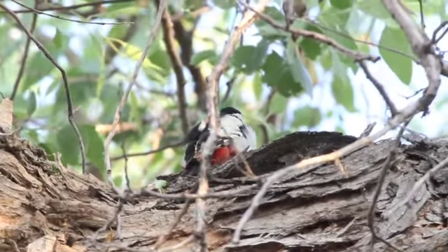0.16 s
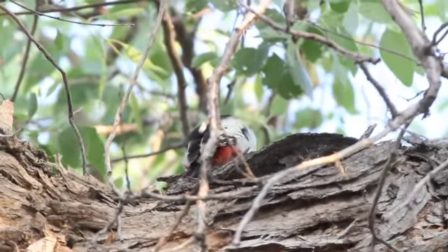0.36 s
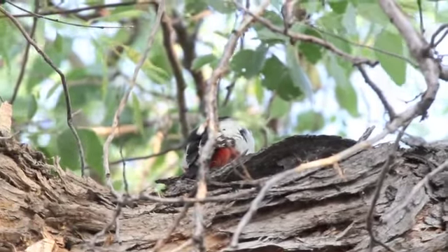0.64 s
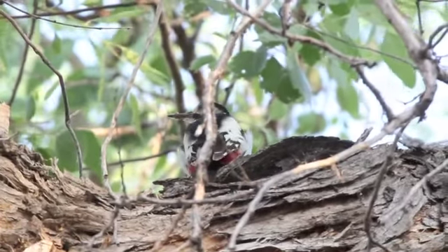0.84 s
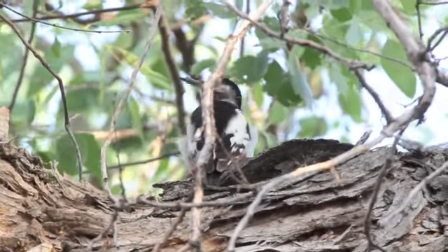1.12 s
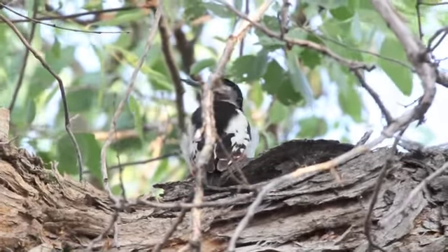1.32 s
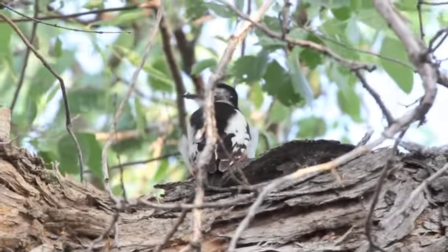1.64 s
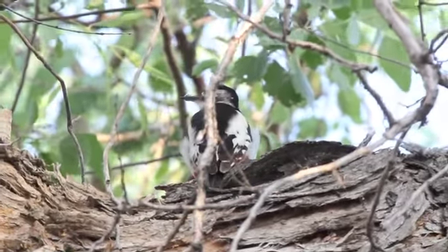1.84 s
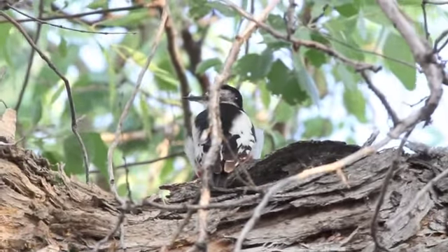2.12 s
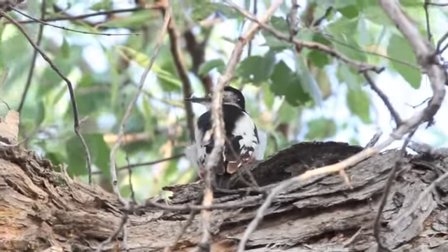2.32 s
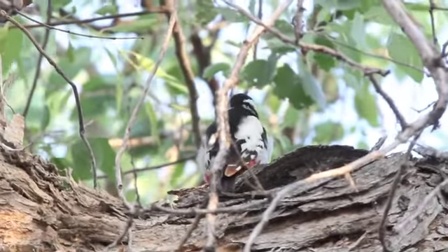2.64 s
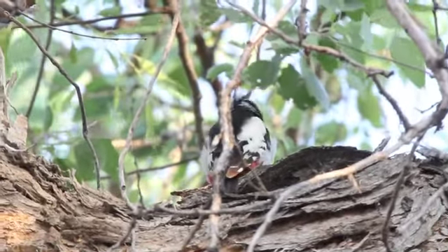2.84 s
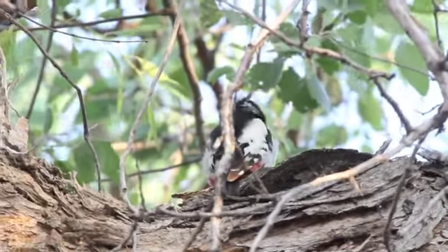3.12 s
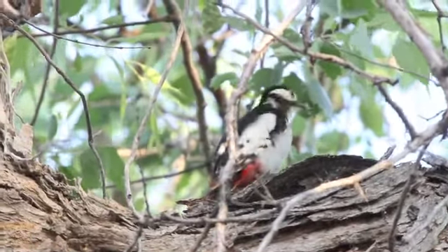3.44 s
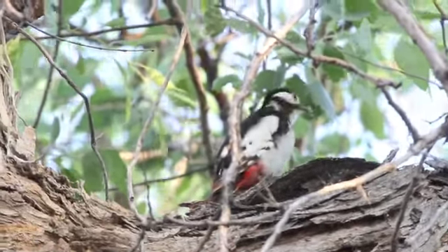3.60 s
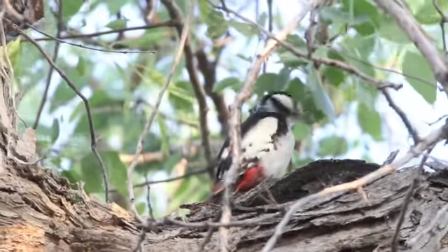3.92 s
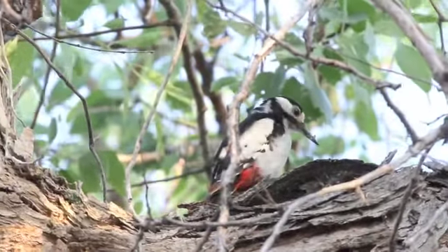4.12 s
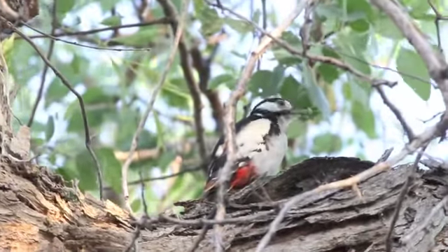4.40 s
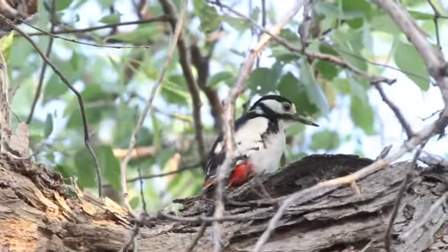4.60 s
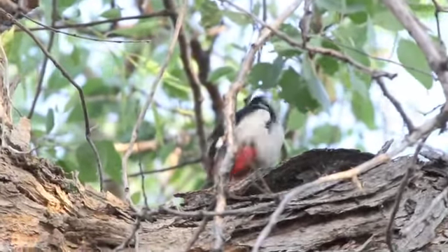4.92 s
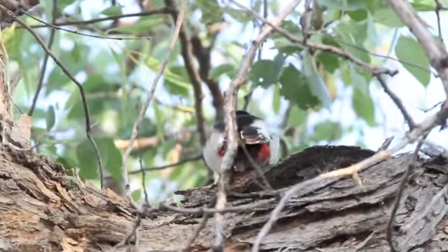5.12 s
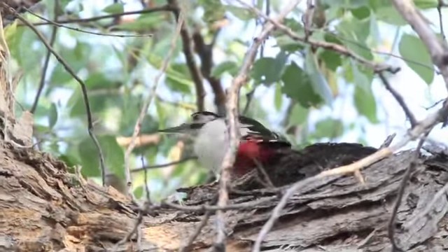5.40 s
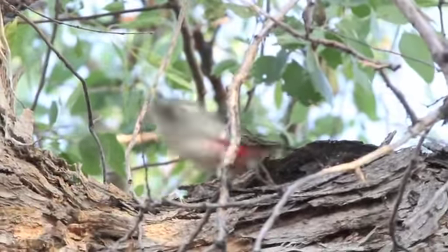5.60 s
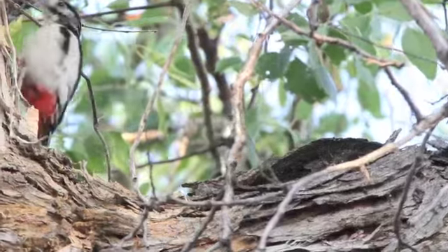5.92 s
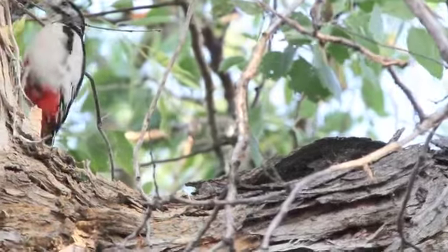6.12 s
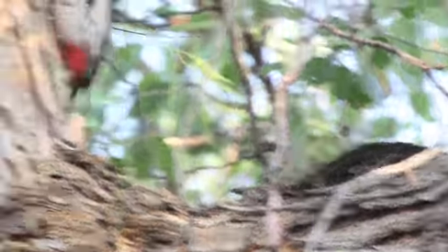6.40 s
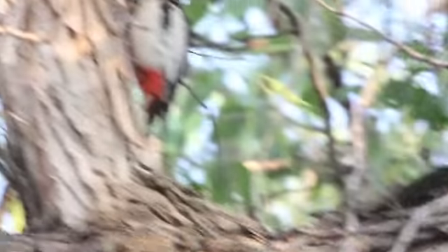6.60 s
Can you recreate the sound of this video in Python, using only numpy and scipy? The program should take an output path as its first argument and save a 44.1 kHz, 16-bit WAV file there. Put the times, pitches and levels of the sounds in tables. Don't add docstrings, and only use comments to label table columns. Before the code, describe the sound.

A quiet woodland ambience runs throughout for about 6.7 seconds: a faint, slightly uneven traffic drone under smooth leafy hiss, with tiny distant bird slurs and warbles at the start. At 0.5 s a woodpecker gives one sharp, arched 'kick', under a tenth of a second long, bright and slightly rough, with a brief echo off trunks and leaves. A faint bird run comes at 1.8 s, then a louder call at 2.1 s as leaves stir softly. From about 2.7 to 4.1 s, tiny, dry, high lens-motor clicks appear, in a steady rapid run around 3.0-3.3 s. Between 3.1 and 3.6 s, wind thumps the microphone in a loud, low, muffled fluttering burst, then fades. The third strong call comes at 4.2 s. Thin seeps and hoarse chatter continue faintly in the distance until the softer fourth call at 6.3 s, its echo fading into the hiss.

```python
import sys
import numpy as np
from scipy import signal
from scipy.io import wavfile
from scipy.ndimage import uniform_filter1d

SR = 44100
rng = np.random.default_rng(int(sys.argv[2]) if len(sys.argv) > 2 else 0)


def unload_wav(signal):
    wavfile.write(
        sys.argv[1],
        SR,
        np.round(np.clip(np.atleast_2d(signal).T, -1, 1) * 32767).astype(np.int16),
    )


def to_linear_factor(level_db):
    exponent = np.asarray(level_db, float) / 20
    return 10 ** exponent


N = 297675


def evened(x):
    return x / np.sqrt(np.mean(x ** 2) + 1e-20)


def read(points, hz):
    f, value = np.transpose(points)
    return np.interp(np.log(hz + 1), np.log(f + 1), value)


def add(mix, s, sound):
    part = mix[round(s * SR):][:len(sound)]
    part += sound[:len(part)]


def noise(colour_db, patchy_db, size):
    hop = size // 4
    frames, hz = N // hop + 5, np.fft.rfftfreq(size, 1 / SR)
    real, imaginary, patches = rng.standard_normal((frames, len(hz), 3)).T
    patches = uniform_filter1d(patches, size=12, axis=0)
    patches = evened(uniform_filter1d(patches, size=10, axis=1))
    z = (real + 1j * imaginary) * to_linear_factor(colour_db(hz)[:, None] + patchy_db * patches)
    return signal.istft(z, nperseg=size, noverlap=size - hop)[1][:N]


def air():
    # (frequency [Hz], density [dB per Hz])
    air_colour = [(15, -42), (25, 1), (49, -25), (91, -12.5), (189, -9), (283, -6.5), (315, -1),
                  (485, -8.5), (618, -3), (854, -15.5), (1180, -15.5), (1550, -13), (1680, -19),
                  (3560, -19.5), (15700, -28.5)]
    # (frequency [Hz], width [Hz], level [dB])
    drone_humps = [(411, 24, 1), (551, 133, -0.5), (1206, 85, 5.5), (1401, 40, -5), (1694, 71, 14.5)]
    drift_db = .5
    rustle_s, rustle_width_s, rustle_db = 2.26, 0.57, 2
    t = np.arange(N) / SR

    def humps(hz):
        return sum(to_linear_factor(0.35 * db) * 5.84 / (1 + (2 * (hz - f) / w) ** 2) for f, w, db in drone_humps)

    def low(hz):
        return -10 * np.log10(1 + (hz / 2500) ** 6)

    def high(hz):
        return 10 * np.log10(1 - to_linear_factor(2 * low(hz)) + 1e-9)

    def drift():
        return evened(sum(np.sin(2 * np.pi * (f * t + rng.random())) for f in (.3, .5, .8, 1.3, 2.1)))

    drone = noise(lambda hz: read(air_colour, hz) + humps(hz) + low(hz), patchy_db=1.35, size=2048)
    hiss = noise(lambda hz: read(air_colour, hz) + high(hz), patchy_db=.2, size=2048)
    drone *= to_linear_factor(drift_db * drift())
    rustle = rustle_db * np.exp(-((t - rustle_s) / rustle_width_s) ** 2)
    hiss *= to_linear_factor(drift_db / 2 * drift() + rustle)
    return to_linear_factor(-50.0) * evened(drone + hiss)


def wind():
    # (time [s], rumble level [dB])
    gust = [(0, -71), (1.30, -69), (1.37, -60), (1.45, -74), (2.33, -72), (2.38, -65), (2.86, -68),
            (3.0, -58.5), (3.1, -53), (3.26, -40.5), (3.32, -27.5), (3.5, -28.5), (3.57, -46), (3.85, -58),
            (4.04, -69), (4.21, -52), (4.57, -80), (6.75, -84)]
    # (frequency [Hz], density [dB per Hz])
    gust_colour = [(12, -46), (20, 1), (70, 1.5), (91, -10), (139, -6), (265, -9.5), (300, -5.5),
                   (390, -24), (660, -120)]
    # (time [s], peak level [dB], frequency [Hz])
    large_eddies = [(1.375, -52, 45), (3.011, -42, 57.3), (3.2185, -38, 93), (3.7957, -40, 94),
                    (4.1993, -43, 74), (3.1345, -23, 113), (3.1447, -17, 164), (3.172, -27.5, 79.7),
                    (3.1908, -27, 101), (3.27, -18.5, 111), (3.2854, -28, 99), (3.301, -12, 120),
                    (3.3136, -8.5, 174), (3.332, -15, 137), (3.3489, -6, 155), (3.3647, -10.5, 160),
                    (3.396, -9.5, 143), (3.4092, -15.5, 155), (3.424, -13.5, 143), (3.443, -8.5, 210),
                    (3.46, -12.5, 116), (3.4732, -15.5, 141), (3.4848, -20, 181), (3.5162, -20.5, 188),
                    (3.5344, -20, 114), (3.551, -12, 136), (3.603, -24, 106), (3.7236, -31.5, 76),
                    (3.825, -42, 80), (4.238, -41, 97)]
    # (time [s], peak level [dB], width [ms])
    snaps = [(1.187, -37, 1.6), (3.1418, -21, 0.6), (3.1476, -26, 1.4), (3.3027, -28, 1.8),
             (3.3101, -19, 0.79), (3.3139, -23, 1.3), (3.3204, -33, 1.1), (3.3255, -15.5, 1.25),
             (3.347, -23.5, 2.2), (3.3674, -26, 1.1), (3.392, -22, 1.9), (3.398, -23, 1.6),
             (3.437, -23.5, 1.9), (3.4422, -24, 0.61), (3.5324, -36, 1.7)]
    eddy_gap_s, eddy_hz = .025, (60, 130)
    eddy_db = 10.5
    out, t = np.zeros(N), np.arange(-1200, 1200) / SR

    late, size, tone = rng.random((round(6.6 / eddy_gap_s), 3)).T
    at = np.arange(.1, 6.7, eddy_gap_s)[:len(late)] + eddy_gap_s * late
    small_db = np.interp(at, *np.transpose(gust)) + eddy_db - 12 * size
    small_eddies = np.transpose([at, small_db, np.interp(tone, (0, 1), eddy_hz)])
    eddies = np.vstack([large_eddies, small_eddies])
    for (s, db, hz), turn in zip(eddies, rng.random(len(eddies))):
        swing = np.exp(-(t * hz / 0.59) ** 2) * np.cos(2 * np.pi * (hz * t + turn))
        add(out, s + t[0], to_linear_factor(db) * swing)
    for (s, db, ms), turn in zip(snaps, rng.random(len(snaps))):
        snap = np.exp(-(1000 * t / ms) ** 2) * np.cos(2 * np.pi * (380 * t + turn))
        add(out, s + t[0], to_linear_factor(db) * snap)
    rumble = evened(noise(lambda hz: read(gust_colour, hz), patchy_db=0.0, size=2048))
    return out + rumble * to_linear_factor(np.interp(np.arange(N) / SR, *np.transpose(gust)))


def whistle(hz, db):
    return to_linear_factor(db) * np.sin(2 * np.pi * np.cumsum(hz) / SR) * np.hanning(len(hz)) ** .6


def trees(x):
    # (frequency [Hz], T60 [s], level [dB])
    tree_bands = np.array([(1000, .3, -5), (2200, 0.66, -2), (2900, 0.28, -0.5), (3440, 0.77, 0.5),
                           (4500, 0.72, 1.5), (6500, 0.55, 3.5), (11000, 0.57, 3), (15000, .25, -7)])
    taps = np.zeros(SR)
    at = np.arange(200, SR - 20, 20)
    taps[at + rng.integers(0, 20, len(at))] = rng.laplace(size=len(at))
    hz, t, z = signal.stft(taps, SR, nperseg=256)
    t60 = read(tree_bands[:, :2], hz)[:, None]
    db = read(tree_bands[:, ::2], hz)[:, None]
    decay = to_linear_factor(-60 * t / t60)
    near = to_linear_factor(9.0 - 60 * t / 0.089)
    tail = signal.istft(z * to_linear_factor(db) * (decay + near), SR, nperseg=256)[1]
    return signal.fftconvolve(x, tail / np.linalg.norm(tail))[:N]


def far_birds():
    # (time [s], first pitch [Hz], last pitch [Hz], level [dB rms])
    slurs = [(.012, 2450, 1900, -59), (.065, 1950, 2150, -60), (.12, 3200, 2600, -62),
             (.256, 2550, 1900, -58), (.29, 1800, 2080, -58), (.318, 2050, 2220, -57),
             (.43, 2400, 2700, -64), (1.81, 5350, 5000, -65), (2.89, 2300, 2500, -61),
             (3.44, 2250, 2400, -62), (3.70, 5800, 5400, -69), (4.485, 5200, 6300, -61),
             (5.02, 2000, 2400, -60), (5.47, 2200, 2700, -61), (5.54, 3000, 2600, -63),
             (5.57, 2800, 2300, -64), (6.70, 3800, 3600, -62)]
    # (time [s], length [s])
    seeps = [
        (3.97, .14),
        (4.59, .08),
        (5.14, .15),
        (6.22, .1),
    ]
    # (first time [s], gap [s], notes [count], pitch [Hz])
    chatter = [
        (1.80, .09, 3, 3800),
        (4.91, .1, 4, 3350),
        (5.335, .125, 2, 3400),
        (5.82, .104, 5, 2200),
    ]
    slur_s = .035
    seep_hz, seep_fall_hz_per_s, seep_db = 7450, 3200, -67.5
    chatter_db, chatter_s, chatter_arch, chatter_hoarse = -59, .06, .12, .1
    out = np.zeros(N)

    for s, first_hz, last_hz, db in slurs:
        add(out, s, whistle(np.linspace(first_hz, last_hz, round(slur_s * SR)), db + 2.5))
    for s, length in seeps:
        add(out, s, whistle(seep_hz - seep_fall_hz_per_s * np.arange(0, length, 1 / SR), seep_db))
    arch = np.sin(np.pi * np.arange(0, 1, 1 / (chatter_s * SR)))
    for first, gap, count, hz in chatter:
        for s in first + gap * np.arange(count):
            waver = evened(uniform_filter1d(rng.standard_normal(4000), size=90))[:len(arch)]
            bend = 1 + chatter_arch * (arch - .6) + chatter_hoarse * waver
            add(out, s, whistle(hz * bend, chatter_db))
    out *= .9 + .45 * evened(uniform_filter1d(rng.standard_normal(N), size=100))
    return out + to_linear_factor(-4.5) * trees(out)


def push(t, effort, jumps):
    attack_s, attack_db, entry_s, entry_db = 0.022, -21, 0.0034, -3.5
    break_length_s, break_db, recover_s = 0.0062, -3.5, 0.0097
    release_s, release_db, catch_s = 0.0087, -11, 0.00087
    db, swell_db, break_s, after_db, catch_db = effort
    after = swell_db + after_db
    s = [t[0], attack_s - entry_s, attack_s, break_s, break_s + break_length_s, break_s + recover_s,
         t[-1] - release_s, t[-1]]
    levels = [attack_db, entry_db, 0, swell_db, after + break_db, after, after - 2, after + release_db]
    catches = sum(catch_db * np.exp(-((t - j) / catch_s) ** 2) for j in jumps)
    return db + np.interp(t, s, levels) + catches


def note(timing, voice, effort):
    # (start time [s], first pitch [Hz], end time [s], last pitch [Hz])
    registers = [
        (.004, 790, .018, 1070),
        (.0222, 1680, .0315, 1830),
        (.0334, 2080, .053, 2030),
        (.0552, 1650, .062, 1320),
        (.0635, 1070, .072, 800),
    ]
    # (time [s], frequency [Hz])
    mouth = [(.004, 2450), (.018, 3000), (.026, 3500), (.038, 4300), (.051, 4200), (.056, 3200),
             (.0615, 2900), (.063, 3300), (.072, 2550)]
    # (frequency [Hz], level [dB])
    upper_throat = [(4000, -7), (5300, -25.5), (6600, -19), (7600, -26), (8700, -51), (11000, -22.5),
                    (13000, -33.5), (16000, -36)]
    step_hold_s, top_hold_s = .029, .045
    step_s, jumps_s = (.021, .033), (.0332, .0535)
    half_step, half_else = .2, .035
    top_arch_hz, shimmer_db = 140, 1.5
    start, pitch, step, top = timing
    low_db, tilt_db, high_db, top_db, _ = voice

    s, hz = np.reshape(registers, (-1, 2)).T
    t = np.arange(s[0], s[-1] + step + top, 1 / SR)
    phase = t - np.clip(t - step_hold_s, 0, step) - np.clip(t - step - top_hold_s, 0, top)
    half = np.where((phase > step_s[0]) & (phase < step_s[1]), half_step, half_else)
    mouth_hz = np.interp(phase, *np.transpose(mouth))
    arch = np.sin(np.pi * np.clip((phase - s[4]) / (s[5] - s[4]), 0, 1))
    hz = np.interp(phase, s, hz) + top_arch_hz * arch
    height = hz / hz.max()
    wobble = 1 + 0.01 * evened(uniform_filter1d(rng.standard_normal(4000), size=40))[:len(t)]
    hz = hz * pitch ** np.clip((height - .86) / .07, 0, 1) * wobble

    turns, k = np.cumsum(hz) / SR, np.arange(1, 41)[:, None] / 2
    slope = np.where(k * hz < mouth_hz, 2.3, 1)
    throat = (1 + ((k * hz - mouth_hz) / 430) ** 2) ** -slope
    upper = to_linear_factor(read(upper_throat, k * hz) + high_db + top_db * (k * hz > 12000)) * (k > 1)
    lines = np.where(k == 1, to_linear_factor(low_db + tilt_db * np.log2(height)), throat + upper)
    lines = lines * np.where(k % 1, half, 1) * (k * hz < 16000)
    flutter = evened(uniform_filter1d(rng.standard_normal((40, 4000)), size=90, axis=1))
    lines = lines * to_linear_factor(shimmer_db * flutter[:, :len(t)])
    sound = (lines * np.cos(2 * np.pi * (k * turns + rng.random(k.shape)))).sum(0)
    sound /= np.sqrt((lines ** 2).sum(0) / 2)

    breath_band = signal.butter(1, [2000, 8000], "bandpass", fs=SR)
    rush = signal.lfilter(*breath_band, rng.standard_normal(4000))
    sound += 0.2 * rush[:len(t)]
    level = to_linear_factor(push(t, effort, (jumps_s[0] + step, jumps_s[1] + step + top)))
    return start + t[0], sound * signal.windows.tukey(len(t), .1), level


def woodpecker():
    # (start time [s], top pitch [factor], extra time on the step [s], extra time at the top [s])
    timings = [
        (.482, 1.018, 0, 0),
        (2.096, 1, 0, 0),
        (4.206, 1.005, 0, .001),
        (6.330, 1.05, .003, .001),
    ]
    # (lowest line [dB], its tilt [dB per octave], upper lines [dB], top lines [dB], echo [dB])
    voices = [(-8, -7.5, 10.5, 5, -1.5), (-7.5, 15, 4, 7, -6.5), (-15.5, -1.5, 5, -2, -7.5),
              (-1.5, 17, 7, -12, 0)]
    # (effort [dB rms], swell [dB], break time [s], level after the break [dB], catch at jumps [dB])
    efforts = [(-33, 2, 0.039, -4, 5), (-24, 1.5, 0.0456, -4, -15), (-26.5, 8, 0.037, -9.5, 2.5),
               (-34, 0.5, 0.044, -2.5, 2)]
    direct, thrown = np.zeros(N), np.zeros(N)
    for timing, voice, effort in zip(timings, voices, efforts):
        s, sound, level = note(timing, voice, effort)
        add(direct, s, sound * level)
        even_level = np.minimum(level, to_linear_factor(-6) * level.max())
        add(thrown, s, to_linear_factor(voice[-1]) * sound * even_level)
    add(direct, .033, to_linear_factor(-19.0) * thrown)
    return direct + trees(thrown)


def lens_motor():
    # (frequency [Hz], level [dB], T60 [s])
    casing = [(8716, -8, .016), (10890, -6, .007), (12000, -5, .008), (12830, -5, .008), (13640, -2, .009),
              (14600, -8, .006)]
    # (time [s], peak level [dB])
    knocks = [
        (2.7206, -49),
        (2.7879, -54),
        (3.1182, -40),
        (3.18, -50),
        (3.8176, -51),
        (4.1164, -55),
        (4.1403, -47),
        (6.7157, -51),
    ]
    first_step_s, step_gap_s, steps = 2.9685, .0305, 11
    step_db, step_edge_db, step_spread_db = -49, -3, 3
    low_first_db, low_last_db, knock_low_db = 1, 9, 1
    whir_start_s, whir_end_s, whir_db = 2.85, 4.05, -68.5
    out, t = np.zeros(N), np.arange(900) / SR

    along, (late, size) = np.linspace(0, 1, steps), rng.random((steps, 2)).T
    run_s = first_step_s + step_gap_s * (np.arange(steps) + .06 * (late - .5))
    run_db = step_db + step_edge_db * (2 * along - 1) ** 2 - step_spread_db * size
    run_low_db = low_first_db + (low_last_db - low_first_db) * along
    ticks = list(zip(run_s, run_db, run_low_db)) + [(s, db, knock_low_db) for s, db in knocks]
    for (s, db, low_db), turns in zip(ticks, rng.random((len(ticks), len(casing)))):
        ring = np.zeros(len(t))
        for (hz, mode_db, t60), turn in zip(casing, turns):
            uneven_db = 10 * (7 * turn % 1)
            decay = to_linear_factor(mode_db + low_db * (hz < 9500) - uneven_db - 60 * t / t60)
            ring += decay * np.sin(2 * np.pi * (hz * t + turn))
        add(out, s, to_linear_factor(db + 5) * ring * (1 - np.exp(-t / .0004)))

    length = round((whir_end_s - whir_start_s) * SR)
    whir_band = signal.butter(2, [8000, 15000], "bandpass", fs=SR)
    whir = signal.lfilter(*whir_band, rng.standard_normal(length))
    add(out, whir_start_s, to_linear_factor(whir_db) * evened(whir) * signal.windows.tukey(length, .3))
    return out


def scene():
    return (air() + wind() + far_birds() + woodpecker() + lens_motor())[None]


def low_pass(x):
    return signal.sosfilt(signal.butter(12, 16140, fs=SR, output="sos"), x)


def record(dry):
    bass_cut = signal.butter(2, 54, "highpass", fs=SR, output="sos")
    mix = signal.sosfilt(bass_cut, dry)
    mix = signal.oaconvolve(mix, signal.firwin(511, 15740, fs=SR)[None], "same")
    return low_pass(mix)


dry = scene()
out = record(dry)
unload_wav(out)
```